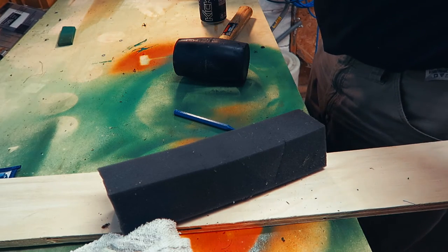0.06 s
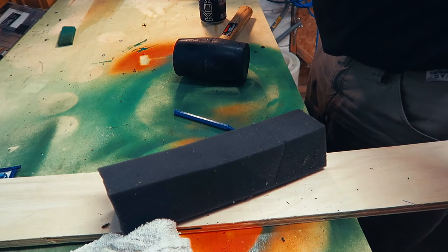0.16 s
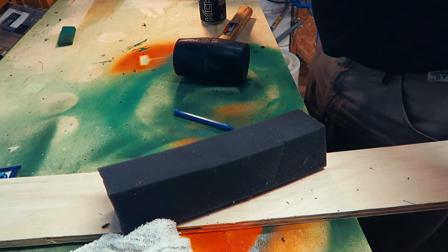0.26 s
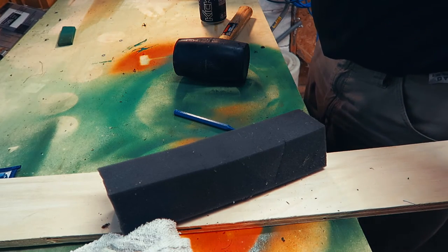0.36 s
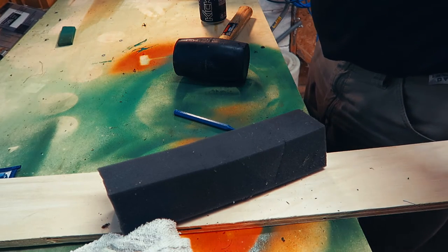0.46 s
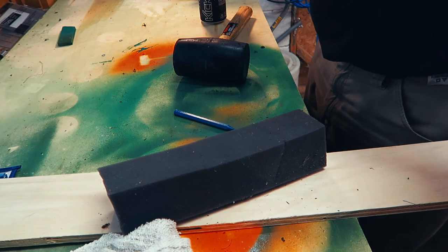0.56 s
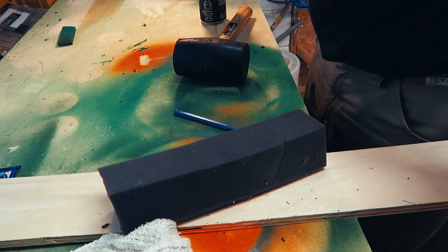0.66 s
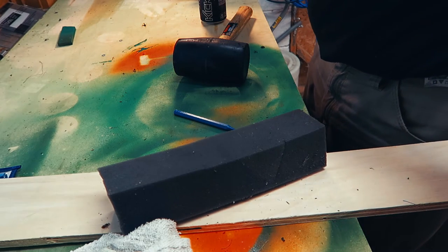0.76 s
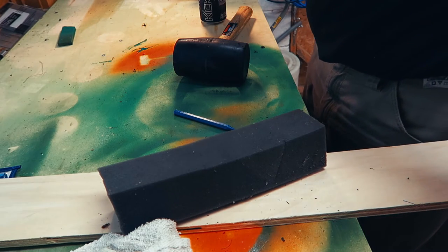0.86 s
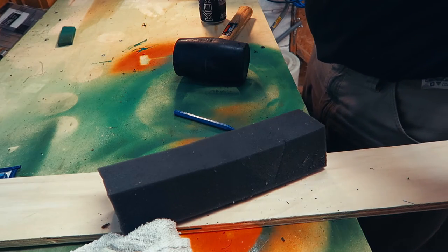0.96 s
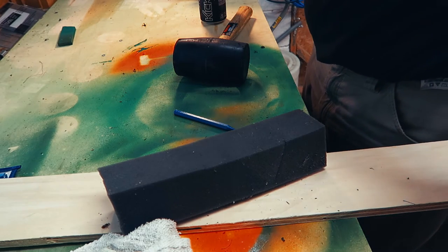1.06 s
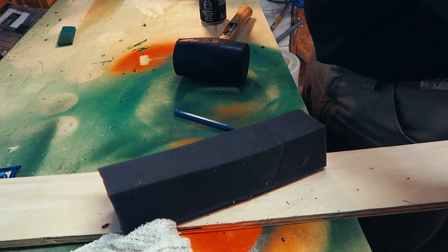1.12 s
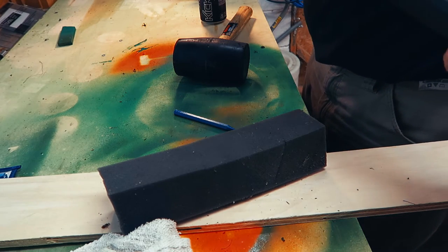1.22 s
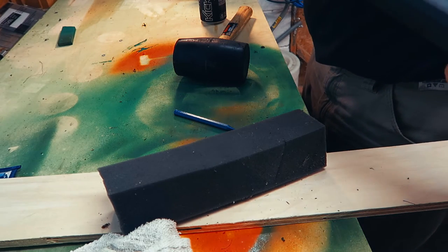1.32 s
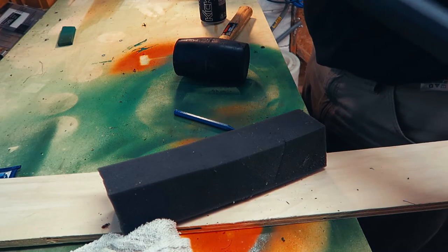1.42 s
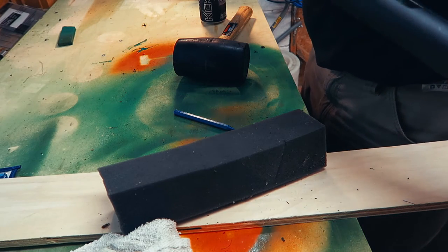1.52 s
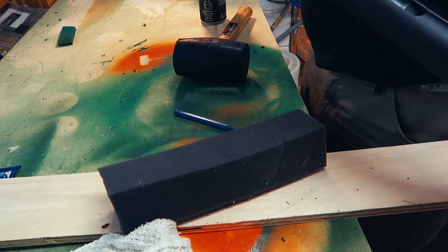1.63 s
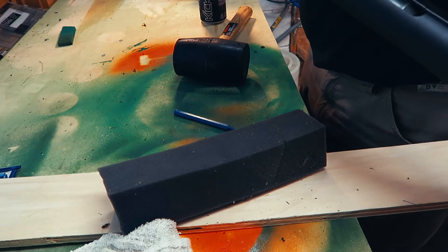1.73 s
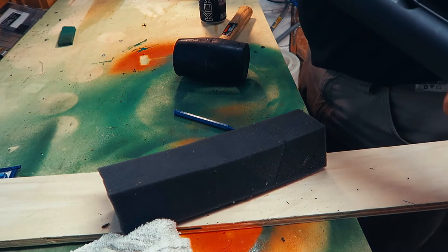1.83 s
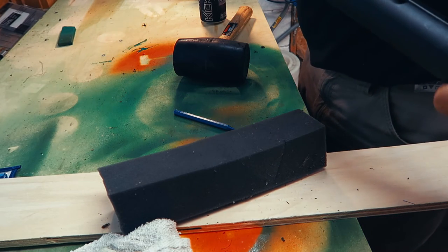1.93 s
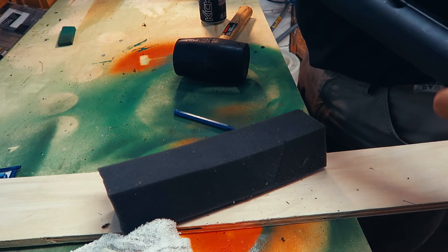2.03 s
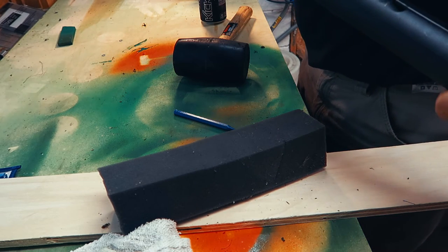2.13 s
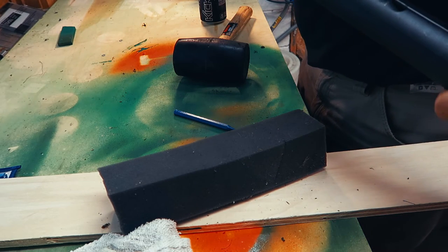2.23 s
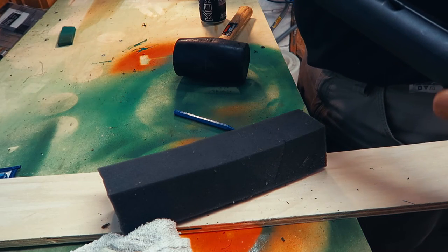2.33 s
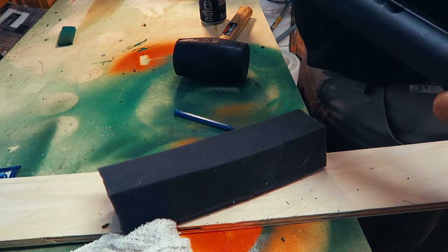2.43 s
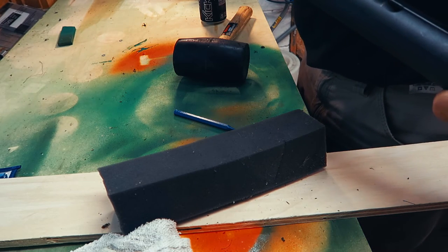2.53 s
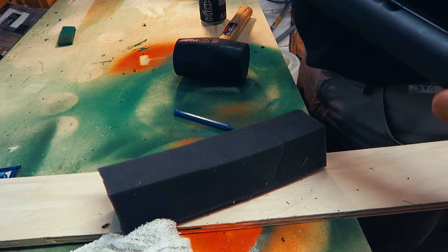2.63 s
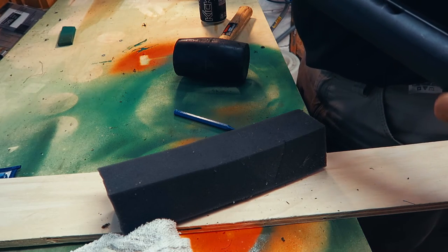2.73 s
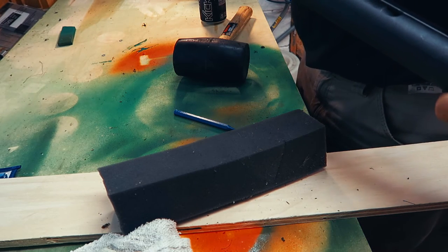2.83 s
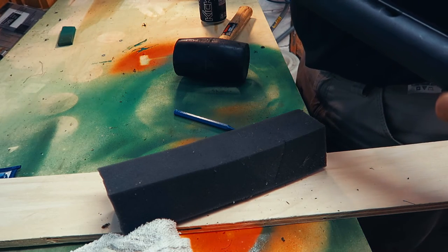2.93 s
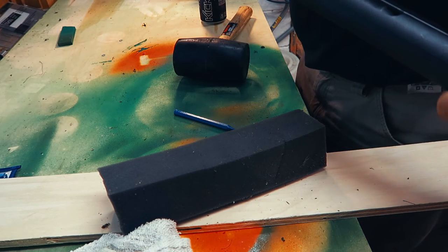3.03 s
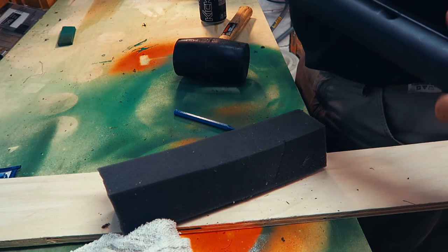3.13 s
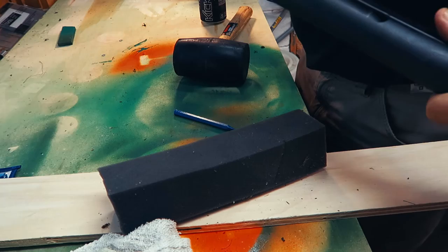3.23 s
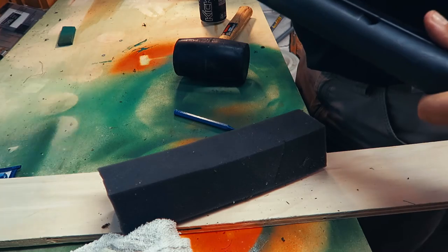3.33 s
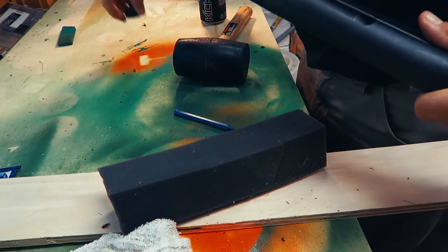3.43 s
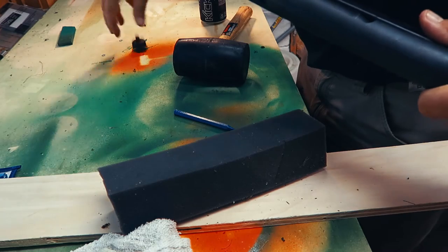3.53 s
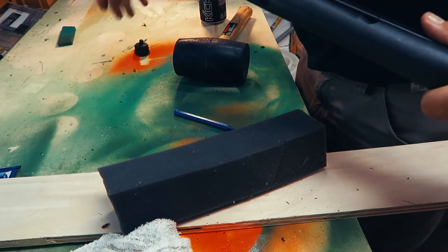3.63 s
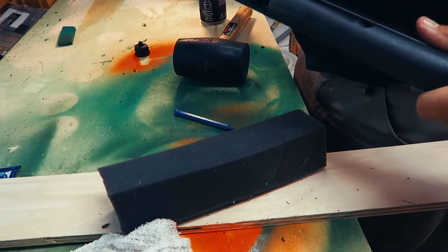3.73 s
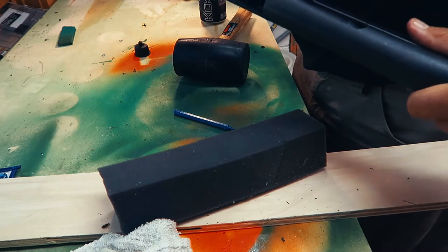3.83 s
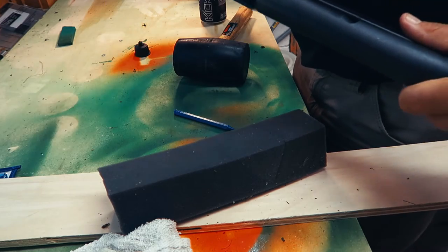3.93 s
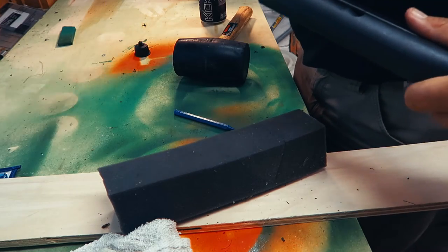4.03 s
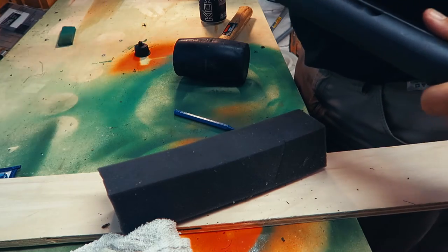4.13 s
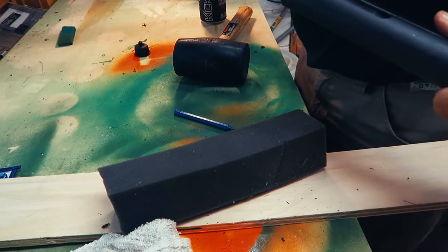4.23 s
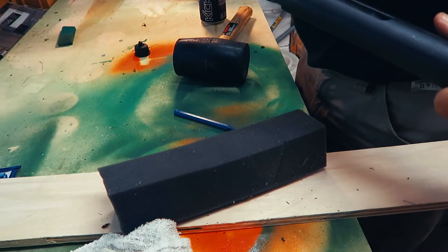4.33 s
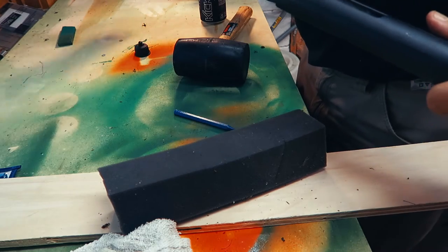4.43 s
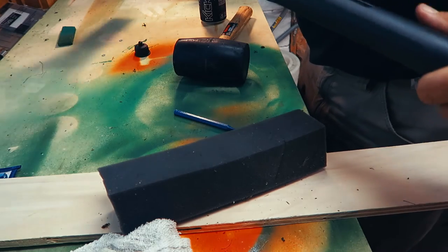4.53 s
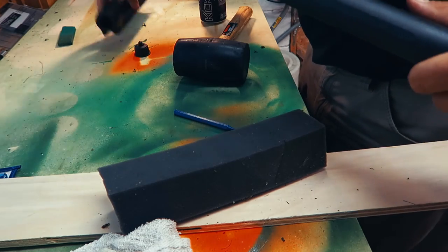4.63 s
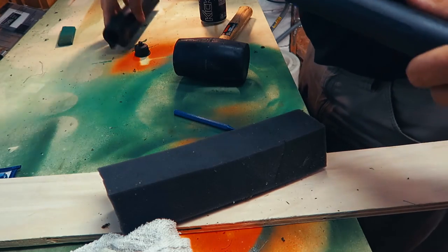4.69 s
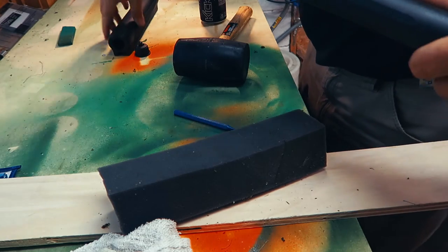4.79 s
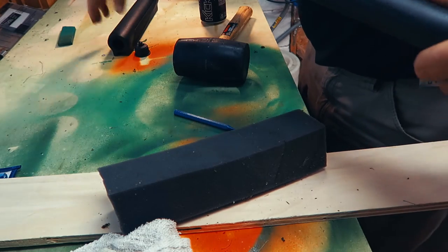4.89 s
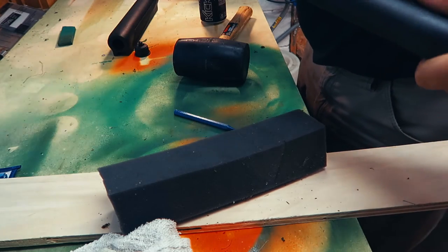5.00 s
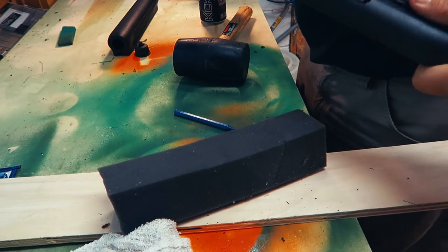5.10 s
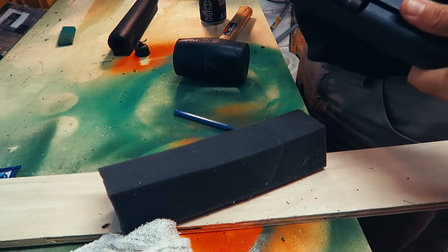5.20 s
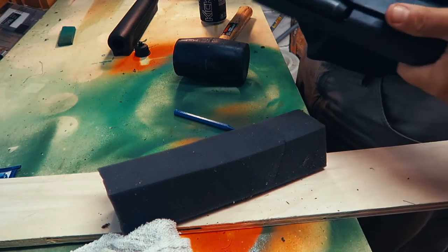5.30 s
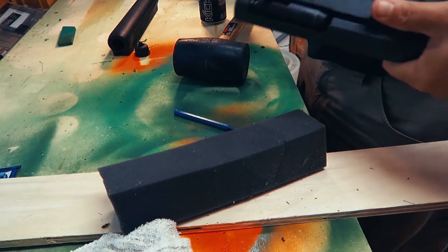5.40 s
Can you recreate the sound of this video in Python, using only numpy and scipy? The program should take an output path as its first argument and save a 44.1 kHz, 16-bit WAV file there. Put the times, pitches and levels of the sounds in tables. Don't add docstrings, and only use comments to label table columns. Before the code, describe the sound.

Hands dismantle metal firearm parts at a wooden bench, heard very near with short room echoes. Two dry ratcheting twists come first, with sparse ticks between, then uneven metallic clacks and scrapes. A distorted hard blow follows as the cap is put down, next snappy sliding catches of a hollow grip, finally its duller wooden clatter. Soft air, low rumble and sleeve rustle lie beneath.

```python
import sys
import numpy as np
from scipy import signal
from scipy.fft import rfft, irfft, next_fast_len
from scipy.io import wavfile
from scipy.ndimage import uniform_filter1d

SR = 44100
rng = np.random.default_rng(int(sys.argv[2]) if len(sys.argv) > 2 else 0)


def decibels_to_gain(level_db):
    exponent = np.asarray(level_db, float) / 20
    return 10 ** exponent


def to_wav(sig):
    pcm = np.clip(np.atleast_2d(sig), -1, 1) * 32767
    pcm = np.round(pcm).astype(np.int16)
    wavfile.write(sys.argv[1], SR, pcm.T)


N = 240565


def evened(x):
    return x / np.sqrt(np.mean(x ** 2) + 1e-30)


def wander(shape):
    count, first, second = shape
    noise = uniform_filter1d(rng.standard_normal(count), first)
    return evened(uniform_filter1d(noise, second))


def read(points, hz):
    f, value = np.transpose(points)
    return np.interp(np.log(hz + 1), np.log(f + 1), value)


def add(mix, s, sound):
    part = mix[round(s * SR):][:len(sound)]
    part += sound[:len(part)]


def body(slope, modes):
    hz = abs(np.fft.fftfreq(8192, 1 / SR))
    db = read(slope, hz)
    for f, width, top_db in modes:
        db = db + top_db / (1 + (2 * (hz - f) / width) ** 2)
    log_gain = np.log(decibels_to_gain(np.maximum(db, -100)))
    taps = np.fft.ifft(np.exp(np.conj(signal.hilbert(log_gain)))).real[:3000]
    return taps / np.linalg.norm(taps)


def strikes(rows, taps, sharp=4, rise=2):
    near, to_walls = np.zeros((2, N))
    wall_ring = .3
    t = np.arange(4000) / SR
    grit = rng.standard_normal((len(rows), len(t)))
    for (s, db, hz, chatter_db, t60, ms), noise in zip(rows, grit):
        u = t * 1000 / max(ms, .2)
        soft = np.exp(-2 * np.pi * 24000 / max(ms, .2) / SR)
        push = signal.lfilter([1], [1, -soft], noise * np.tanh(sharp * u) * np.exp(-2.2 * u))
        chatter = signal.fftconvolve(push, taps)[:len(t)]
        chatter *= decibels_to_gain(chatter_db) / abs(chatter).max()

        neighbour_hz = hz * (1 + .2 * np.tanh(noise[0]))
        pair = np.sin(2 * np.pi * hz * t) + .45 * np.sin(2 * np.pi * neighbour_hz * t)
        ring = pair * (1 - np.exp(-(rise * u) ** 2)) * decibels_to_gain(-60 * t / max(t60, .003))
        ring /= abs(ring).max()

        gain = decibels_to_gain(db + 0.5) / abs(ring + chatter).max()
        add(near, s, gain * (ring + chatter))
        smooth = evened(signal.lfilter([1], [1, -soft], taps))
        smooth *= np.linalg.norm(chatter) / np.sqrt(len(taps))
        add(to_walls, s, gain * wall_ring * ring)
        add(to_walls, s + ms / 2000, gain * smooth)
    return np.array([near, to_walls])


def stroke(start, hardest, end, db, treble_db):
    dull = .3 * treble_db
    return [(start, db - 13, dull), (hardest, db, treble_db), (end, db - 14, dull)]


def rubbing(tables, taps, per_s, spread_db, lumpy_db):
    caught = (rng.random(N) < per_s / SR) * rng.choice([-1., 1.], N)
    burrs = caught * decibels_to_gain(spread_db * np.minimum(rng.exponential(1, N), 4))
    lumps = wander((N, 300, 200))
    rub = evened(signal.oaconvolve(burrs * decibels_to_gain(lumpy_db * lumps), taps)[:N])
    treble = signal.sosfiltfilt(signal.butter(2, 4000, "high", fs=SR, output="sos"), rub)
    out, t = np.zeros(N), np.arange(N) / SR
    for rows in tables:
        s, db, treble_db = np.transpose(rows)
        span = (t > s[0]) & (t < s[-1])
        u = t[span]
        edge = np.clip(np.minimum(u - s[0], s[-1] - u) / 0.0062, 0, 1)
        extra_treble = (decibels_to_gain(np.interp(u, s, treble_db)) - 1) * treble[span]
        out[span] += edge * decibels_to_gain(np.interp(u, s, db)) * (rub[span] + extra_treble)
    return out


def random_pair(frames, bins, alike):
    a, b, c, d = rng.standard_normal((frames, bins, 4)).T
    alike = np.clip(alike, -1, 1)
    left, other = a + 1j * b, c + 1j * d
    return np.array([left, alike * left + np.sqrt(1 - alike ** 2) * other])


def hiss(slope, alike, patchy_db):
    frames, hz = N // 512 + 3, np.fft.rfftfreq(1024, 1 / SR)
    patches = uniform_filter1d(rng.standard_normal((frames, 513)), 6, 0)
    patches = evened(uniform_filter1d(patches, 10, 1)).T
    z = random_pair(frames, 513, alike) * decibels_to_gain(read(slope, hz)[:, None] + patchy_db * patches)
    return evened(signal.istft(z, window="cosine", nperseg=1024, noverlap=512)[1][:, :N])


# t/s, level/dB
BACKGROUND_LEVEL = [(0, -1), (.45, 3), (.7, -4), (1.35, -3), (1.52, 4), (1.7, -2), (1.95, -4), (2.35, 1.5),
                    (2.65, .5), (3, 7), (3.6, 9), (3.72, -2), (3.94, -5), (4.38, 0), (4.6, -2), (4.8, .5),
                    (5.12, -8), (5.45, -6)]


def background_db():
    return np.interp(np.arange(N) / SR, *np.transpose(BACKGROUND_LEVEL))


# f/Hz, level/dB
AIR_SPECTRUM = [(88, -33), (150, -4.5), (366, -5.5), (982, -14), (1260, -13), (1380, -16), (2060, -17),
                (2740, -21.5), (3310, -22), (10900, -41), (14000, -60)]


def room_air():
    return decibels_to_gain(-59 + .7 * background_db()) * hiss(AIR_SPECTRUM, .1, 1.7)


# f/Hz, level/dB
RUMBLE_SPECTRUM = [(20, -11.5), (45, 1.5), (90, 2.5), (150, -13), (250, -24.5), (500, -58)]


def bench_rumble():
    sides = decibels_to_gain(np.array([[-1.3], [1.3]]))
    return decibels_to_gain(-64 + 1.1 * background_db()) * hiss(RUMBLE_SPECTRUM, .95, 2.5) * sides


# f/Hz, level/dB
CLOTH_SPECTRUM = [(1000, -26), (2500, -2.5), (5000, 3), (8500, -6), (11500, -5), (13000, -10.5),
                  (15000, -39.5)]
# f/Hz, width/Hz, level/dB
LAMP_WHINE = (13500, 120, -24)
# hardest t/s, length/s, level/dB
SLEEVES = [
    (0, .4, -73),
    (.7, .5, -74),
    (1.5, .3, -78),
    (3.05, .6, -75),
    (3.55, .6, -70),
    (3.94, .12, -76),
    (4.42, .15, -70),
]


def sleeves_and_whine():
    t = np.arange(N) / SR
    hz, width, whine_db = LAMP_WHINE
    whine = hiss([(hz - 2 * width, -60), (hz, 0), (hz + 2 * width, -60)], .3, 4.0)
    level = decibels_to_gain(-86 + .3 * background_db())
    for s, length, db in SLEEVES:
        level = level + decibels_to_gain(db) * np.exp(-(2 * (t - s) / length) ** 2)
    return level * (hiss(CLOTH_SPECTRUM, 0.3, 2.5) + decibels_to_gain(whine_db) * whine)


# f/Hz, width/Hz, level over the slope/dB
STEEL_RESONANCES = [(1290, 30, 6.5), (1510, 100, 6.3), (1790, 510, 3.3), (2650, 220, 2.4), (3450, 300, 4.5),
                    (6260, 180, 4.7), (6720, 500, 4), (11500, 990, 4)]
# f/Hz, level/dB
THREAD_SLOPE = [(88, -65.5), (150, -33.5), (494, -13.5), (578, -15.5), (1020, -7), (1290, -3.5),
                (1560, -10), (1870, -2.5), (3040, -14), (6510, -26.5), (8400, -39), (11700, -35.5),
                (12800, -38), (13500, -54), (16000, -66.5)]


def threaded_cap():
    return body(THREAD_SLOPE, STEEL_RESONANCES)


# start t/s, hardest t/s, end t/s, level/dB, treble/dB
THREAD_STROKES = [(0, .04, .12, -50, 17), (.39, .46, .49, -51, 6), (1.42, 1.51, 1.56, -55, 10),
                  (2.046, 2.07, 2.14, -49, 14), (2.09, 2.16, 2.245, -43.5, 3), (1.372, 1.39, 1.45, -55, 3),
                  (2.245, 2.265, 2.31, -41, 7), (2.425, 2.44, 2.48, -36, 4), (2.46, 2.51, 2.58, -42, 9),
                  (2.73, 2.737, 2.755, -36, .5), (2.76, 2.79, 2.9, -33, 3.5),
                  (3.095, 3.115, 3.135, -29, .5), (3.125, 3.16, 3.19, -27, 1.5)]


def thread_scrapes():
    strokes = [stroke(*row) for row in THREAD_STROKES]
    return rubbing(strokes, threaded_cap(), per_s=5000, spread_db=3.8, lumpy_db=3)


# t/s, level/dB, f/Hz, chatter/dB
REGRIP_TICKS = [(0.015, -52.5, 2900, -9), (0.028, -39, 1560, 4), (0.05, -54, 1700, 0),
                (0.242, -39.5, 1750, 15.5), (0.259, -44, 1270, -4), (0.429, -40.5, 2700, -1),
                (0.438, -22.5, 2054, 13.5), (0.928, -27, 1495, 3), (1.071, -43, 433, -7),
                (1.189, -40, 420, 2.5), (1.303, -46.5, 1850, -4.5), (1.374, -29, 2158, 6),
                (1.455, -32, 562, -13), (1.4834, -44, 1500, 4), (1.542, -44, 1100, 6),
                (1.554, -35, 1877, 1.5), (1.876, -35, 1270, 8), (4.402, -47, 3566, 7.5),
                (5.293, -39, 2480, 7), (5.415, -47, 2270, 2)]


def regrip_ticks():
    t60_s, contact_ms = .023, 4.5
    return strikes([(*row, t60_s, contact_ms) for row in REGRIP_TICKS], threaded_cap())


# t/s, f/Hz, level/dB, rise/s, t60/s
SINGING_PARTS = [(3.644, 11678, -44, .03, .33), (3.644, 11692, -47, .03, .33), (.1, 1120, -53, .03, .6),
                 (3.945, 1270, -55, .002, .2), (4.42, 2200, -64, .06, 1.5), (4.84, 1270, -53, .01, 1.2),
                 (3.644, 60, -19, .002, .08), (3.644, 95, -24, .002, .09), (3.644, 36, -21, .002, .07),
                 (4.068, 1275, -32, .005, .35), (4.176, 1275, -24, .005, .22), (1.374, 3720, -63, .004, .4),
                 (1.454, 680, -42, .002, .05), (1.374, 780, -54, .004, .2), (1.502, 2780, -53, .002, .1),
                 (1.374, 2085, -44.5, .002, .28), (1.454, 585, -37, .003, .12),
                 (1.303, 1750, -54, .003, .2), (1.32, 2800, -53, .02, .15)]


def rings():
    out, t = np.zeros(N), np.arange(SR) / SR
    for s, hz, db, rise, t60 in SINGING_PARTS:
        waver = 1 + .55 * wander((SR, 200, 200))
        swell = decibels_to_gain(db - 60 * t / t60) * (1 - np.exp(-t / rise))
        add(out, s, waver * swell * np.sin(2 * np.pi * hz * t))
    return out


# t/s, level/dB, f/Hz
STEEL_CLINKS = [(0.402, -44, 4800), (1.4536, -37, 2910), (1.502, -38, 2800), (2.2488, -34, 4410),
                (2.7896, -40, 2640), (1.312, -56, 4300), (1.5025, -52, 6500), (1.456, -56, 7000),
                (2.791, -33, 4500)]


def steel_clinks():
    chatter_db, t60_s, contact_ms = 1.5, .035, 2.4
    return strikes([(*row, chatter_db, t60_s, contact_ms) for row in STEEL_CLINKS], threaded_cap())


def drag(start, end, db, treble_db):
    bite_s, ease_s = .04, .09
    return [(start, db, 8.5), (start + bite_s, db, treble_db), (end - ease_s, db, treble_db), (end, db, -2)]


# start t/s, end t/s, level/dB, treble when pressed hardest/dB
RATCHET_DRAGS = [
    (.484, .85, -37, 18),
    (1.556, 1.81, -33, 15),
]


def ratchet_drag():
    return rubbing([drag(*row) for row in RATCHET_DRAGS], threaded_cap(), per_s=5000, spread_db=3.8, lumpy_db=3)


# f/Hz, level/dB
STEEL_SLOPE = [(88, -68.5), (150, -41), (1060, -15.5), (1260, -9), (1390, -18), (1940, -12), (2270, -11),
               (3490, -9), (4860, -18), (6640, -19), (9080, -30), (11900, -21.5), (16000, -51)]
# t/s, level/dB, f/Hz
FIRST_TEETH = [(0.4951, -.5, 3647), (0.5194, -4, 1847), (0.545, -7, 1600), (0.5756, -2, 1970),
               (0.6006, -6, 1954), (0.6194, -8, 1960), (0.6317, -3.5, 1633), (0.6562, -6.5, 3450),
               (0.679, -6.5, 1890), (0.7012, -7, 3450), (0.7204, -5, 1510), (0.7424, -10, 1510),
               (0.7626, -7, 2400), (0.788, -7.5, 1245), (0.817, -21, 1100), (0.823, -9.5, 1790)]
# t/s, level/dB, f/Hz
SECOND_TEETH = [(1.5611, -3.5, 1980), (1.5791, -5.5, 1954), (1.5933, .5, 1900), (1.6118, -5.5, 1934),
                (1.633, -8, 1707), (1.658, -2.5, 1850), (1.675, -12, 2570), (1.6874, -22, 3450),
                (1.7, -7.5, 1890), (1.7145, -15, 2840), (1.7274, -14.5, 2970), (1.74, -13, 1930),
                (1.7503, -11.5, 2000), (1.7627, -10.5, 2130), (1.7725, -10, 1614), (1.7854, -14, 1850),
                (1.7993, -20, 1834)]


def detent_ratchet():
    t60_s, contact_ms = .011, 3
    teeth = [(*row, 3.5, t60_s, contact_ms) for row in FIRST_TEETH]
    teeth += [(*row, -.5, t60_s, contact_ms) for row in SECOND_TEETH]
    return strikes(teeth, body(STEEL_SLOPE, STEEL_RESONANCES), sharp=1.2)


# t/s, level/dB, f/Hz, contact/ms
THREAD_KNOCKS = [(2.051, -23.5, 1215, 5.1), (2.064, -18.5, 1175, 2.2), (2.092, -21, 1940, 3.5),
                 (2.128, -33, 1250, 2.8), (2.251, -26, 2090, 3), (2.256, -24.5, 1300, 1),
                 (2.419, -26, 1250, 7), (2.434, -21, 1380, 1.8), (2.485, -25.5, 1850, 8.5),
                 (2.508, -20.5, 1290, 3), (2.543, -29.5, 1780, 4.3), (2.734, -20.5, 1780, 4),
                 (2.7385, -21, 2000, 3), (2.77, -24, 1510, 3.5), (2.79, -23.5, 2410, 3.6),
                 (2.807, -14.5, 2035, 3.5), (2.822, -25, 1800, 5), (2.838, -25, 1500, 5),
                 (2.863, -30, 1290, 4), (2.881, -30, 1300, 3.8), (3.074, -34, 1260, 9),
                 (3.092, -34, 1900, 4), (3.098, -27, 1270, 5.2), (3.11, -20.5, 1950, 5),
                 (3.134, -22, 1950, 8), (3.154, -16, 1290, 3), (3.164, -15.5, 1300, 6),
                 (3.17, -15, 1900, 5)]


def thread_knocks():
    chatter_db, t60_s = 7, .012
    rows = [(s, db, hz, chatter_db, t60_s, ms) for s, db, hz, ms in THREAD_KNOCKS]
    return strikes(rows, threaded_cap())


# f/Hz, width/Hz, level over the slope/dB
BENCH_RESONANCES = [(370, 50, 4), (500, 50, 5), (700, 50, 4), (1000, 60, 4), (1270, 80, 3), (1430, 60, 3),
                    (2200, 200, 2)]
# f/Hz, level/dB
CAP_ON_BENCH = [(25, -34), (130, -23), (220, -11), (420, -12), (900, -5), (1200, -4), (2300, -4),
                (3000, -8), (4000, -15), (7000, -21), (12000, -25), (17000, -44.5)]
# t/s, level/dB, f/Hz, t60/s, contact/ms
CAP_LANDING = [
    (3.6345, -19, 1650, .12, 5),
    (3.644, 13, 2270, .03, 3.4),
    (3.6485, 10, 2300, .03, 3.5),
    (3.653, 0, 1200, 0.035, 6),
    (3.664, -10, 1300, .03, 4),
    (3.762, -35, 500, .07, 14),
    (3.778, -38, 750, .06, 14),
]


def cap_put_down():
    chatter_db = 9
    rows = [(s, db, hz, chatter_db, t60, ms) for s, db, hz, t60, ms in CAP_LANDING]
    return strikes(rows, body(CAP_ON_BENCH, BENCH_RESONANCES))


# f/Hz, level/dB
GRIP_SLOPE = [(59, -62.5), (100, -41.5), (350, -14.5), (415, -23), (721, -11), (801, -15), (1310, -3.5),
              (1390, -6.5), (1950, -6.5), (10700, -38), (16000, -51)]
# f/Hz, width/Hz, level over the slope/dB
GRIP_RESONANCES = [(370, 60, 4), (1265, 40, 6), (1640, 80, 4), (1990, 120, 3)]


def hollow_grip():
    return body(GRIP_SLOPE, GRIP_RESONANCES)


# t/s, level/dB, f/Hz, chatter/dB, t60/s
GRIP_CATCHES = [(3.9445, -30, 1280, -7, .03), (3.9962, -21, 1255, -3, .012), (4.0057, -17, 1270, -5, .025),
                (4.06, -28, 1800, 4, .02), (4.0645, -16, 1800, 2, .035), (4.067, -17, 3000, 4, .012),
                (4.075, -24, 1800, 3, .03), (4.1364, -13, 1900, -2, .04), (4.143, -16, 1300, 3, .03),
                (4.1508, -8, 1970, 2, .045), (4.159, -13, 1400, 2, .04), (4.166, -14, 1900, 3, .025),
                (4.1733, -7, 1275, 1, .06), (4.176, -27, 360, -3, .1), (4.187, -15, 1700, 3, .03),
                (4.196, -19, 1300, 2, .03), (4.207, -21, 1503, -8, .04)]
# t/s, level/dB, f/Hz
RIM_SNAPS = [
    (4.006, -40, 11500),
    (4.06, -42, 11500),
    (4.151, -25, 10800),
]


def grip_catches():
    rows = [(*row, 3.5) for row in GRIP_CATCHES]
    snap_chatter_db, snap_t60_s, snap_ms = 3, .01, 1.5
    rows += [(*row, snap_chatter_db, snap_t60_s, snap_ms) for row in RIM_SNAPS]
    return strikes(rows, hollow_grip(), sharp=10, rise=7)


# start t/s, hardest t/s, end t/s, level/dB, treble/dB
GRIP_TUGS = [
    (3.995, 4.02, 4.07, -36, -2),
    (4.055, 4.07, 4.165, -29.5, 4),
    (4.135, 4.17, 4.215, -22, 6),
    (4.19, 4.21, 4.33, -39, -8),
]


def grip_slide():
    tugs = [stroke(*row) for row in GRIP_TUGS]
    return rubbing(tugs, hollow_grip(), per_s=4000, spread_db=4, lumpy_db=2.5)


# f/Hz, level/dB
GRIP_ON_BENCH = [(40, -44), (150, -14.5), (300, -13), (500, -5), (1000, -5), (1600, -6), (2300, -11),
                 (3500, -20), (5500, -37), (8000, -45), (12000, -70)]
# t/s, level/dB, f/Hz, t60/s
GRIP_LANDING = [(4.829, -33, 1700, .03), (4.8358, -2, 1000, .04), (4.841, -6, 520, .045),
                (4.85, -9, 1000, .03), (4.854, -5, 2150, .012), (4.856, -5, 1150, .025),
                (4.861, -6, 520, .035), (4.867, -15, 2700, .012), (4.868, -6, 1600, .04),
                (4.874, -7, 1400, .04), (4.881, -11, 800, .025)]
# t/s, level/dB, f/Hz, t60/s
GRIP_ROCK = (4.914, -12.5, 700, .09)


def grip_set_down():
    rows = [(s, db, hz, 2, t60, 5.5) for s, db, hz, t60 in GRIP_LANDING]
    s, db, hz, t60 = GRIP_ROCK
    rows.append((s, db, hz, -2, t60, 8))
    return strikes(rows, body(GRIP_ON_BENCH, BENCH_RESONANCES), rise=3.5)


# t/s, level/dB, f/Hz, chatter/dB, t60/s
RIM_CRACK = (4.836, -16, 3900, 5, .015)


def grip_rim_crack():
    return strikes([(*RIM_CRACK, 3.5)], hollow_grip(), sharp=10, rise=7)


# f/Hz, likeness/0-1
ECHO_LIKENESS = [(60, .98), (200, .93), (550, .95), (1650, .88), (3500, .7), (6000, .5), (15000, .4)]


def echoes(x, decay):
    hz, t = np.fft.rfftfreq(256, 1 / SR), np.arange(400) * 64 / SR
    turn, out = 2 * np.pi * 14 * np.arange(N) / SR, 0
    for window in (np.sin(turn), np.cos(turn)):
        z = random_pair(400, 129, read(ECHO_LIKENESS, hz)[:, None])
        z = z * decibels_to_gain(-60 * t / read(decay, hz)[:, None])
        tail = signal.istft(z, nperseg=256, noverlap=192)[1]
        tail *= np.clip(np.arange(tail.shape[1]) / SR / 0.0015 - 1, 0, 1)
        tail /= np.linalg.norm(tail[0])
        out = out + signal.fftconvolve(window * x[None], tail, axes=1)[:, :N]
    return out


# f/Hz, level/dB
PORT_DIFFERENCE = [(300, -27), (1200, -22), (2000, -25), (4000, -10.5), (7000, -6.5), (15000, -14)]


def two_ports(x):
    scatter = rng.standard_normal(60) * np.exp(-np.arange(60) / 15)
    size = next_fast_len(N)
    shift = 1j * evened(rfft(scatter, size).real)
    level = decibels_to_gain(read(PORT_DIFFERENCE, np.fft.rfftfreq(size, 1 / SR)))
    side = irfft(rfft(x, size) * shift * level, size)[:N]
    return np.array([x + side, x - side])


# f/Hz, t60/s
WORKSHOP_DECAY = [(150, 0.15), (400, .33), (1040, 0.23), (2760, 0.23), (5000, .24), (8000, 0.26),
                  (13000, 0.23)]
# f/Hz, t60/s
UNDER_BENCH_DECAY = [(100, 0.17), (250, .42), (700, 0.29), (1500, .3), (3000, 0.27), (6000, .19),
                     (10000, 0.12)]


def scene():
    room_tone = room_air() + bench_rumble() + sleeves_and_whine()
    held = regrip_ticks() + steel_clinks() + detent_ratchet() + thread_knocks()
    held += grip_catches() + grip_rim_crack()
    held += thread_scrapes() + ratchet_drag() + grip_slide()
    cap, grip = cap_put_down(), grip_set_down()
    near = held[0] + cap[0] + grip[0] + rings()
    from_walls = decibels_to_gain(-6.5) * echoes(held[1], WORKSHOP_DECAY)
    from_bench = echoes(decibels_to_gain(-14) * cap[1] + decibels_to_gain(-8) * grip[1], UNDER_BENCH_DECAY)
    return two_ports(near) + from_walls + from_bench + room_tone


def roll_off(x):
    return signal.sosfilt(signal.butter(12, 16190, fs=SR, output="sos"), x)


def record(dry):
    overloaded = np.clip(dry, -1, 1)
    return roll_off(overloaded)


dry = scene()
out = record(dry)
to_wav(out)
```